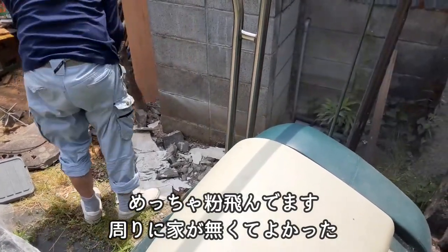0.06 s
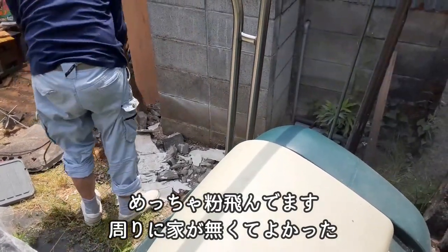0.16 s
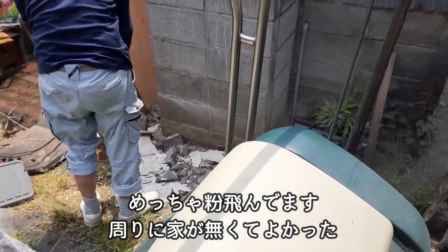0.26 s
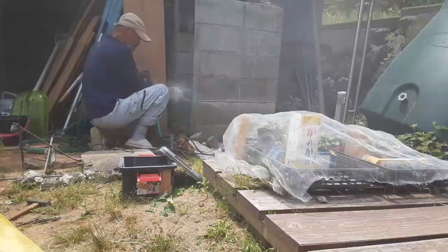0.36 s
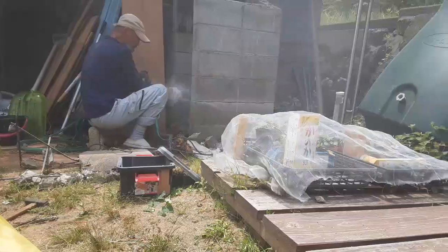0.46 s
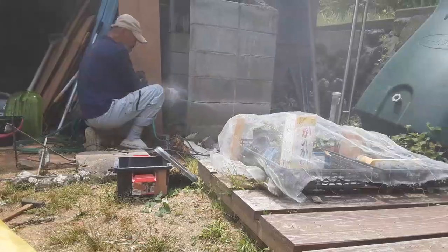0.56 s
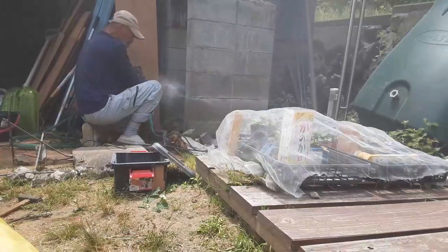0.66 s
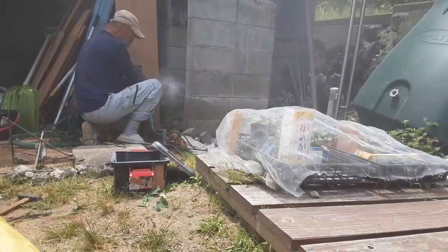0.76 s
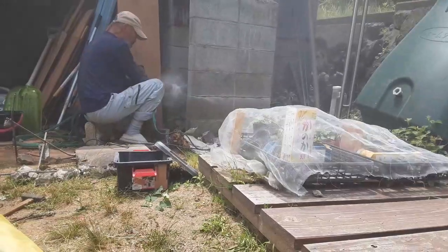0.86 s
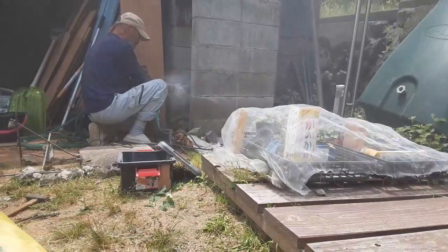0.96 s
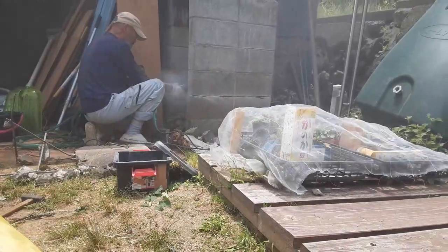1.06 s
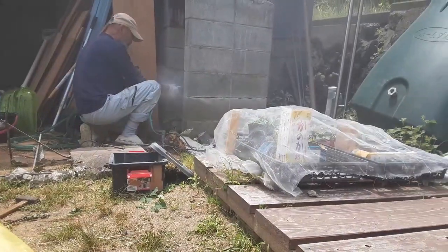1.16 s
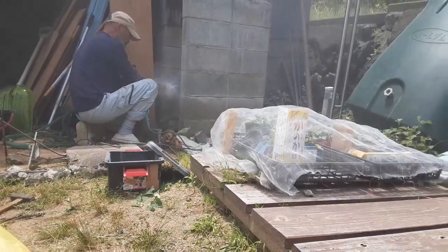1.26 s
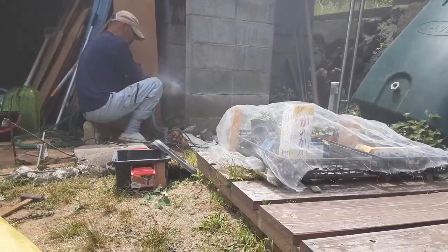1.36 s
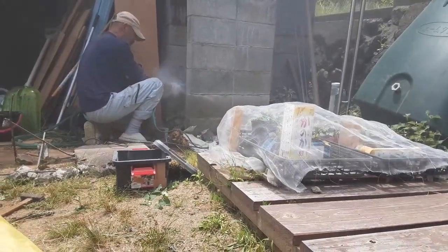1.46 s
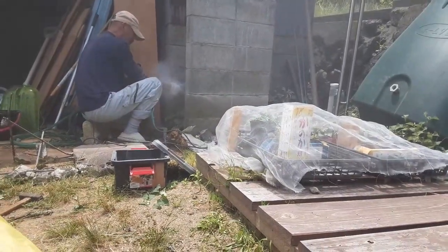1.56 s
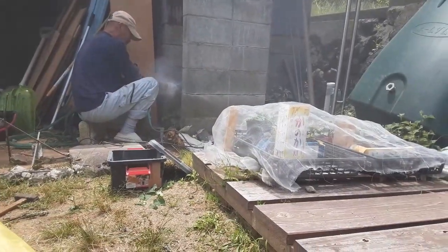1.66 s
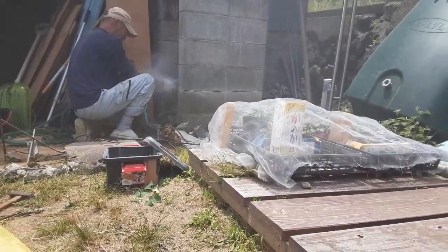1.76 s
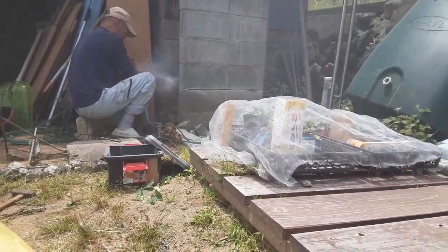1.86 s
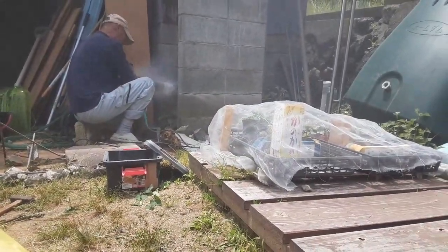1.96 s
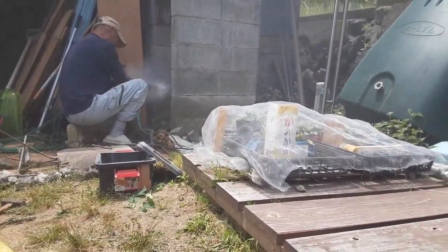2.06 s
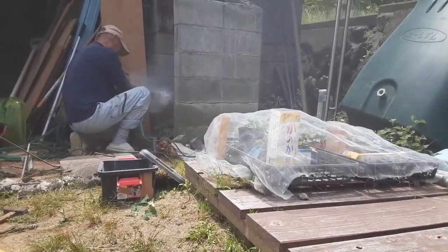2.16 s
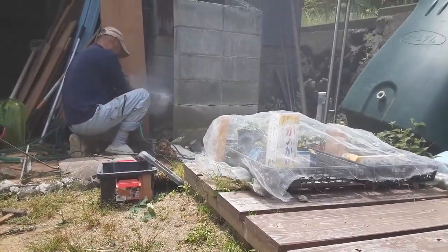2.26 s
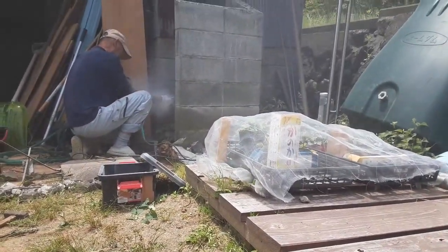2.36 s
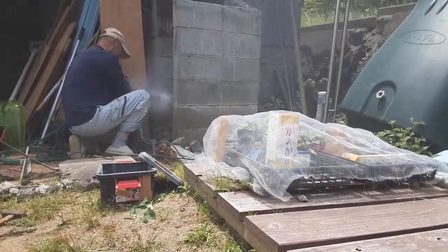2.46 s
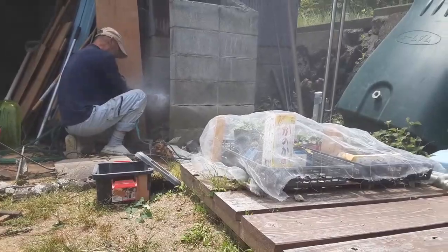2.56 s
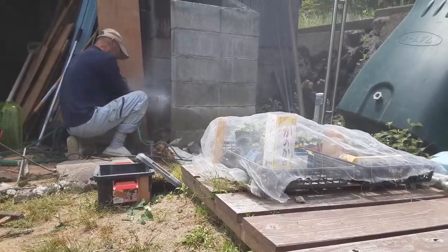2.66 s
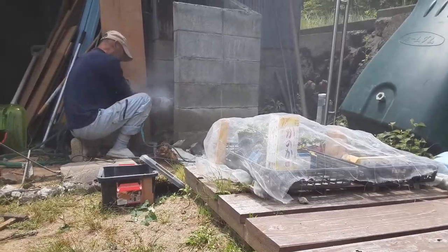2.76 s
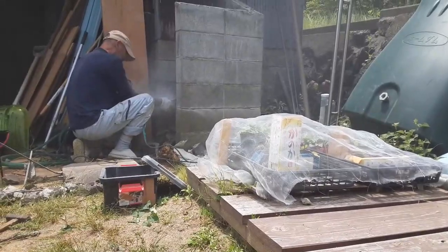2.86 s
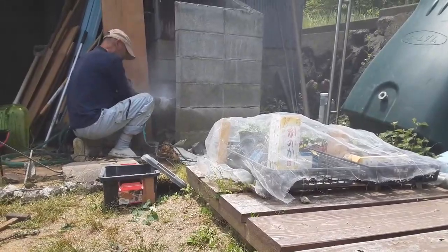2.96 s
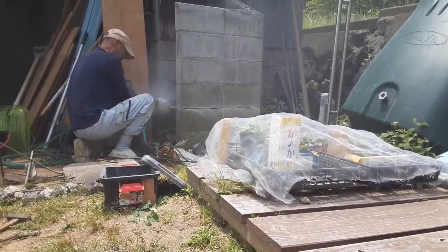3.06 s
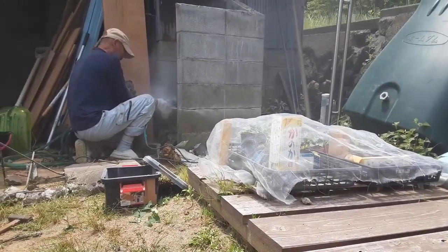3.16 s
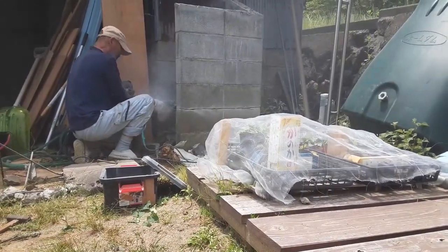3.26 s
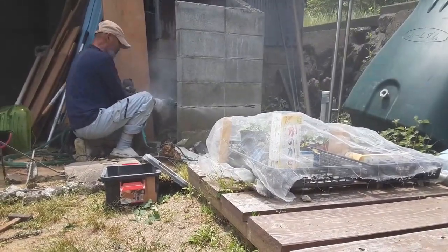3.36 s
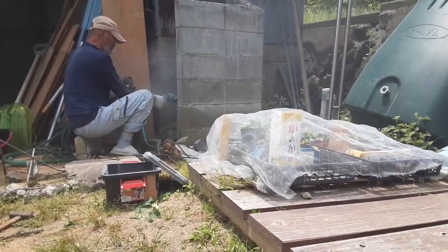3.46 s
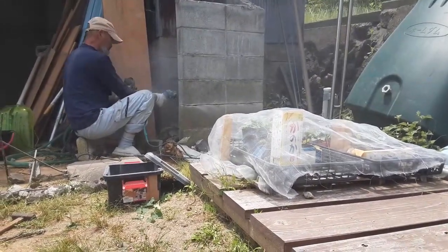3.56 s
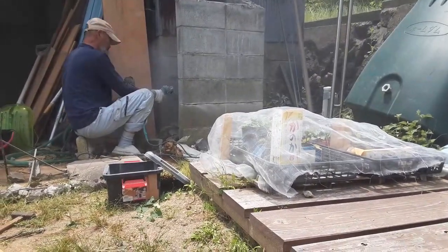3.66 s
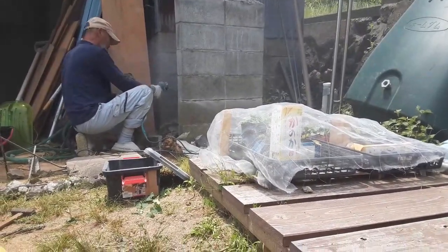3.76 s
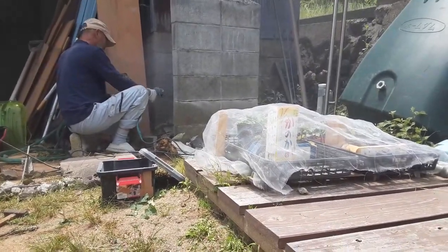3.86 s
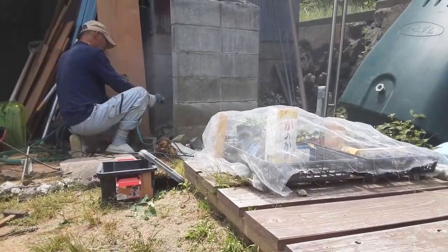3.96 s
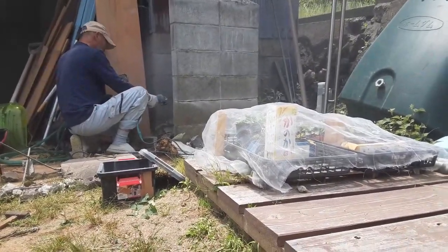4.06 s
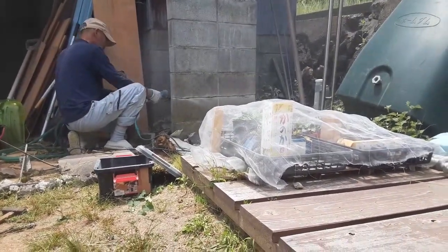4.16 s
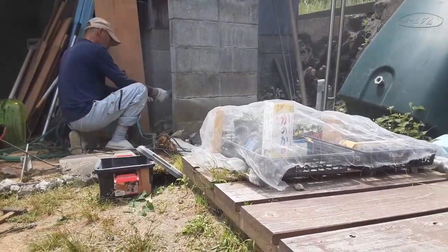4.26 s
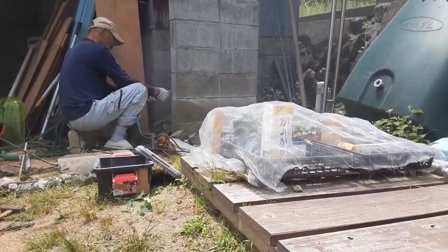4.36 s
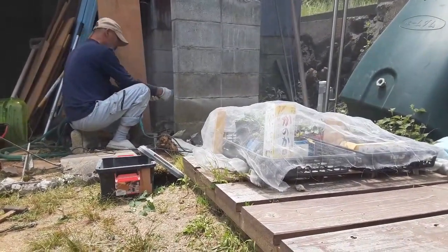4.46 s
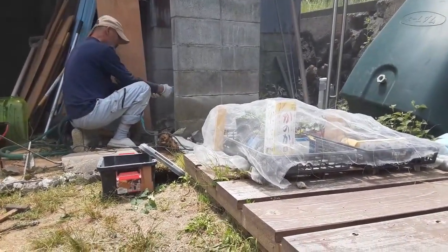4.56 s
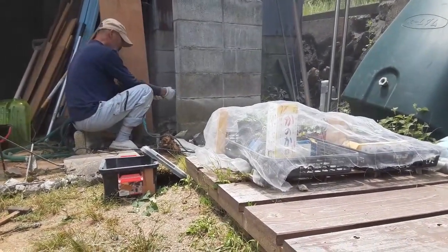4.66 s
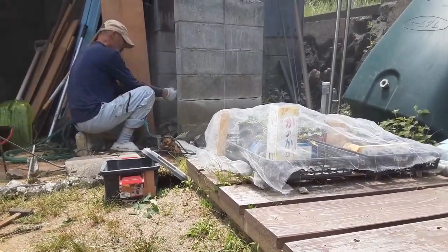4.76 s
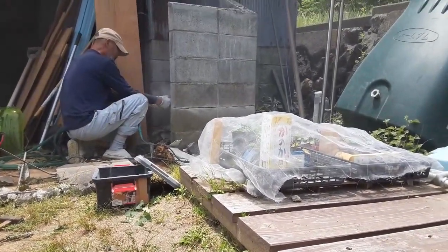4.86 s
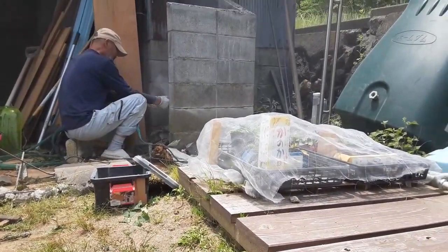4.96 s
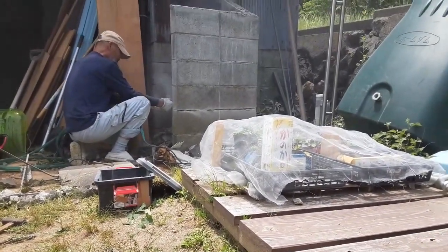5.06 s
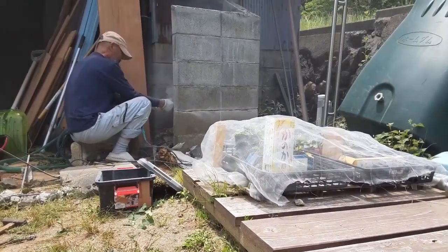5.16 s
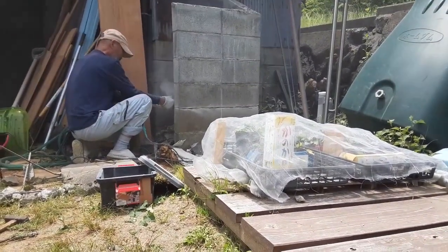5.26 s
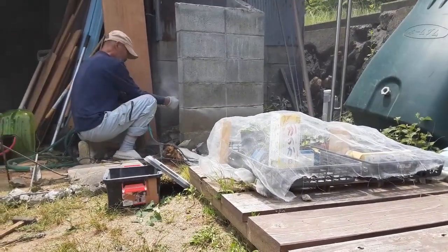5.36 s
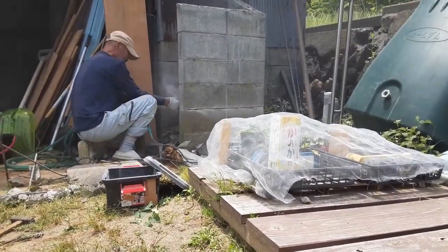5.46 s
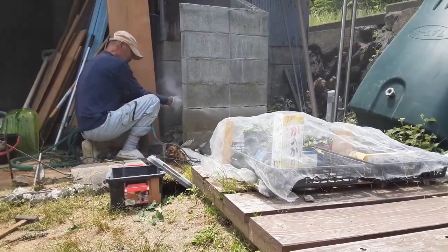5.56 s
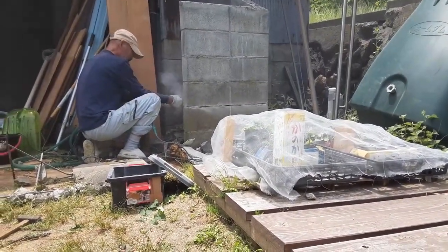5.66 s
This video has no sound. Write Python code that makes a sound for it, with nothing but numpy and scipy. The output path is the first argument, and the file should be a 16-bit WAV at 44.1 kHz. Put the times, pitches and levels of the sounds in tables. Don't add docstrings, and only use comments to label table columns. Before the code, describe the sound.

Steady low hum underlies a hissing power grinder cutting concrete with a gritty metallic screech; the hum stops dead, and after a pause the cutting resumes.

```python
import sys
import numpy as np
from scipy import signal
from scipy.fft import rfft, irfft, next_fast_len
from scipy.io import wavfile
from scipy.ndimage import uniform_filter1d, map_coordinates

SR = 44100
rng = np.random.default_rng(int(sys.argv[2]) if len(sys.argv) > 2 else 0)


def master(y):
    cut = np.clip(np.atleast_2d(y).T, -1, 1)
    pcm = np.round(cut * 32767)
    wavfile.write(sys.argv[1], SR, pcm.astype(np.int16))


def invert_db(level):
    return 10 ** (np.asarray(level, dtype=float) / 20)


N = 251674

# (time [s], pressure [dB], upper modes over lower [dB])
CUT_PRESSURE = [
    [(.47, -42.5, -1), (.68, -40, 1), (.83, -44.5, 0), (.87, -48, 3), (1.02, -46.5, 4), (1.33, -42.5, 1.5),
     (1.8, -42.5, 4), (2.6, -42.5, 2.5), (3.31, -40.5, 2)],
    [(4.38, -69, 7), (4.69, -49, 5.5), (4.74, -45.5, 5.5), (4.8, -42.5, 6), (4.91, -43, 4), (5.0, -43, 2.5),
     (5.16, -42, 2), (5.4, -42.5, 0), (5.71, -41.5, 2)],
]
# (time [s], peak [dB])
RIM_CATCHES = [(.47, -32.5), (.84, -40.5), (1.12, -41.5), (1.35, -40), (2.06, -38.5), (2.67, -38),
               (2.89, -39), (4.434, -41), (4.548, -46), (4.642, -40.5), (4.81, -38), (4.915, -37.5),
               (5.16, -38.5)]
# (time [s], turns [Hz])
DISC_SPEED = [(.46, 115.6), (.7, 112), (1.1, 135.2), (1.5, 121.7), (2, 115.4), (2.4, 118.9), (3.25, 103.8),
              (3.33, 109), (3.42, 142), (4.38, 186), (4.75, 186.3), (4.9, 163.1), (5.15, 134.8),
              (5.3, 127.4), (5.45, 120.2), (5.71, 118.7)]
MODE_HZ = [2080, 2700, 2900, 3250, 3620, 3890, 4780, 4810, 6170, 6180, 8060, 8040, 10490, 10470, 11980,
           13220, 13220, 14380, 16200, 15720]
# (width [Hz], first cut level [dB], second cut level [dB])
MODE_LEVELS = [(84, -4, -7), (32.2, -9.5, -23), (50, -8, 1), (150, -6.5, -9), (50, -5, -2.5),
               (55.7, 0, -7.5), (44.6, -4, 2.5), (79.6, 2, 4.5), (55.3, 3, 2), (82.6, 7.5, 7),
               (80, -4.5, -8), (67, -3, -0.5), (80, -7.5, -9.5), (68.6, 1.5, -1), (202, -8, -9),
               (77, -6.5, -9.5), (50, -2, -2.5), (300, -5, -15), (90, -1.5, -2), (50.3, -20, -3)]
MODE_WAVES = [0, 0, 0, 0, 0, 0, -2, 2, -3, 3, -4, 4, -5, 5, 0, -6, 6, 0, -7, 0]
# (frequency [Hz], level [dB per Hz])
GRIT_COLOUR = [(290, -21), (500, -20), (1680, -12), (2030, -4), (3880, -3.5), (4960, -0.5), (5490, -5),
               (6440, -2.5), (9230, -10), (11100, -2.5), (13300, -6), (14800, -0.5), (15800, -14.5)]
# (time [s], peak [dB])
CHIP_TICKS = [
    (3.4565, -39),
]
# (time [s], airflow [dB])
FREE_RUNS = [
    [(0, -52), (.05, -50), (.26, -42), (.438, -44)],
    [(3.33, -73), (3.43, -82), (3.565, -75.5)],
    [(3.575, -60), (3.88, -57), (4.04, -49.5), (4.19, -43.5), (4.39, -45), (4.71, -48.5), (5.03, -56.5),
     (5.71, -77)],
]
# (frequency [Hz], level [dB per Hz])
FAN_COLOURS = [
    [(180, -65), (300, -13), (331, -29), (454, -16.5), (1180, -5.5), (1290, 0.5), (1420, -5.5), (1700, -5),
     (2890, -1.5), (4370, -11.5), (5330, -5), (11200, -15.5), (15600, -5.5)],
    [(120, -81), (200, -50), (315, -34), (516, -24.5), (565, -27), (608, -16), (860, -16.5), (995, -7),
     (2100, -1.5), (2920, -4.5), (3760, -9.5), (6740, -9.5), (12500, -20.5), (15600, -10)],
]
# (start [s], length [s], from [Hz], to [Hz], peak [dB])
COMMUTATOR = [
    (0, .435, 14450, 15300, -52),
    (3.43, .135, 14000, 15800, -63),
    (3.6, .2, 12300, 13800, -69),
]
# (start [s], length [s], from [Hz], to [Hz], peak [dB])
GEARS = [
    (4.3, .44, 636, 618, -69),
    (4.8, .4, 532, 538, -66),
    (5.48, .23, 525, 543, -71),
    (4.68, .12, 128.2, 124, -71),
    (5.26, .18, 176, 173.3, -67),
]
# (start [s], length [s], peak [dB])
SPINDLE_THRUMS = [
    (4.55, .32, -67),
    (4.97, .28, -58),
    (5.3, .41, -69),
]
# (harmonic number [count]), (rms [dB])
MAINS_OVERTONES = [
    [2, 3, 4, 5, 7, 9, 11, 13],
    [-63.5, -50, -68.5, -61.4, -72.3, -75, -76, -78],
]
# (frequency [Hz], level [dB per Hz])
FUZZ_COLOUR = [(3, 5.5), (20, -2.5), (60, -3), (150, -9.5), (400, -16.5), (1200, -21), (3000, -53)]
# (frequency [Hz], level [dB per Hz])
YARD_COLOUR = [(18, -84), (30, -48), (433, -33), (877, -32), (974, -17.5), (1520, -7), (2310, -14),
               (2500, -15), (4330, -17), (4680, -16), (6240, -14), (15600, -26)]
# (frequency [Hz], level [dB per Hz])
RUMBLE_COLOUR = [(12, -46), (20, -37), (97, 8), (375, 2.5), (532, 2.5), (687, -3), (900, -19), (1170, -31),
                 (1980, -120)]
# (frequency [Hz], left over right [dB])
PORT_BALANCE = [(100, 3), (1200, 0.5), (2100, 2), (2850, -4.5), (3850, 8.5), (4550, 2.5), (5750, -14.5),
                (6550, -5), (7600, 14), (8600, 16), (10000, 3), (11100, 7.5), (12400, 0.5), (14500, 11)]
# (frequency [Hz], left-right likeness [0-1])
LIKENESS = [(60, 0.51), (300, 0.15), (700, 0.085), (2000, 0.07), (15000, .05)]

CATCH_RISE, CATCH_FALL = 420, 390
CATCH_DULLS, CATCH_GRIT = 0.29, 0.53
GRIT_DB, GRIT_GROWS, FIRM_DB = -47.5, 0.63, -42.5
LIFT_S, RING_DIES, UPPER_DIES, GRIT_DIES = .095, 150, 115, 300
HISS_DB, HISS_OPENS, FULL_DB = (-1.5, 26, -0.5), 0.17, -44
SWELL_DB, CREST, EASE = 6, .65, 1.25
MAINS_HZ, MAINS_START, MAINS_OFF = 59.9602, -1.62, 3.57053
WALL_S, WALL_RISE_S, WALL_DB = 4.05, .3, -71


def cutting():
    out = np.zeros((2, N))
    spin_hz = curves(DISC_SPEED)[1]
    for rows, levels_db, pan_db in zip(CUT_PRESSURE, np.transpose(MODE_LEVELS)[1:], (-.6, 1.5)):
        start, stop = rows[0][0] - .006, rows[-1][0] + .15
        on = slice(round(start * SR), round(stop * SR))
        gate, ring_db, upper_db, grit_db = (c[on] for c in touch(rows))
        chatter_db = 0.87 * wobble(14)[on] + 0.47 * wobble(60)[on]
        ring = ringing(levels_db, spin_hz[on], upper_db + 3.5, drift_db=2.5, wander=.0025, alike=0.14)
        spray = invert_db(grit_db + 7.0) * rush(GRIT_COLOUR, patchy_db=1.34, streaky_db=5.0)[:, on]
        pan = pan_db * np.c_[[.5, -.5]]
        out[:, on] += gate * invert_db(chatter_db + pan) * (invert_db(ring_db - 6.0) * ring + spray)
    return out


def touch(rows):
    t, end = np.arange(N) / SR, rows[-1][0]
    _, press_db, upper_db = curves(rows)
    peaks = [db - np.maximum(CATCH_RISE * (s - t), CATCH_FALL * (t - s)) for s, db in RIM_CATCHES]
    ring_db = np.max(peaks + [press_db], axis=0)
    jolt_db = ring_db - press_db
    lifted = np.clip(t - end, 0, None)
    push_db = press_db + CATCH_GRIT * jolt_db - FIRM_DB
    grit_db = GRIT_DB + GRIT_GROWS * push_db - GRIT_DIES * lifted
    upper_db = upper_db - CATCH_DULLS * jolt_db + (RING_DIES - UPPER_DIES) * lifted
    gate = curves([(rows[0][0],), (end + LIFT_S,)])[0]
    return gate, ring_db - RING_DIES * lifted, upper_db, grit_db


def ringing(levels_db, spin_hz, tilt_db, drift_db, wander, alike):
    n, out, hop = len(spin_hz), 0, 8
    t, turned = np.arange(n) / SR, np.cumsum(spin_hz) / SR
    coarse = np.arange(0, n + hop, hop)
    size = len(coarse)
    for hz, (width, *_), waves, db in zip(MODE_HZ, MODE_LEVELS, MODE_WAVES, levels_db):
        pole = np.exp(-np.pi * 1.5 * width * hop / SR)
        kicks = rng.standard_normal((2, size)) + 1j * rng.standard_normal((2, size))
        env = unit(signal.lfilter([1], np.poly([pole, pole]), kicks))
        env[1] = alike * env[0] * np.exp(1j * hz) + np.sqrt(1 - min(alike, 1) ** 2) * env[1]
        detune_hz = wander * hz * wobble(6 * hop, size=size)
        env = env * np.exp(2j * np.pi * np.cumsum(detune_hz) * hop / SR)
        env = env * invert_db(db + drift_db * wobble(4 * hop, size=size)) * np.sqrt(width / 100)
        carrier = np.exp(2j * np.pi * (hz * t + waves * turned)) * invert_db(tilt_db * (hz > 7500))
        out = out + np.array([(np.interp(np.arange(n), coarse, e) * carrier).real for e in env])
    return out


def tick():
    out, t = np.zeros(N), np.arange(SR // 20) / SR
    for s, db in CHIP_TICKS:
        ring = np.sin(2 * np.pi * 6600 * t)
        ring += .7 * np.sin(2 * np.pi * 5600 * t) + 0.34 * np.sin(2 * np.pi * 7700 * t)
        fall = invert_db(db - 1.0 - 60 * t / 0.012)
        out[round(s * SR):][:len(t)] = fall * (ring + .1 * rng.standard_normal(len(t)))
    return out


def fan():
    out = 0
    near, farther = FAN_COLOURS
    for rows, colour, full_db in zip(FREE_RUNS, (near, farther, farther), HISS_DB):
        gate, flow_db = curves(rows)
        air = rush(colour, patchy_db=0.17, streaky_db=4.0) * invert_db(0.37 * wobble(12))
        low = filtered(air, lambda hz: 1 / (1 + (hz / 4200) ** 4))
        hiss = invert_db(full_db + HISS_OPENS * (flow_db - FULL_DB) + 2.5) * (air - low)
        out = out + gate * invert_db(flow_db + 4.5) * (low + hiss)
    return out


def whines():
    t, out = np.arange(N) / SR, 0
    for rows, flutter_db, jitter in ((COMMUTATOR, 3.5, .0015), (GEARS, 4, .014)):
        for s, length, from_hz, to_hz, db in rows:
            left = (1 - np.clip((t - s) / length, 0, 1)) ** EASE
            hz = to_hz + (from_hz - to_hz) * left
            out = out + line(s, length, hz, db, flutter_db, jitter)
    spin_hz = curves(DISC_SPEED)[1]
    for s, length, db in SPINDLE_THRUMS:
        out = out + line(s, length, spin_hz, db, 1.5, 0.01)
    return out


def line(s, length, hz, db, flutter_db, jitter):
    swell = [(s, -SWELL_DB), (s + CREST * length, 0), (s + length, -SWELL_DB / 2)]
    gate, swell_db = curves(swell, fade=0.0088)
    phase = 2 * np.pi * np.cumsum(hz * (1 + jitter * wobble(70))) / SR
    lag = .45 + .35 * wobble(8)
    level_db = db + swell_db + 3.5 + flutter_db * wobble(25)
    return gate * invert_db(level_db) * np.sin([phase + lag, phase - lag])


def hum():
    t = np.arange(N) / SR
    phase = 2 * np.pi * MAINS_HZ * t + MAINS_START
    wave = invert_db(-32.5) * np.cos(phase)
    for k, db in zip(*MAINS_OVERTONES):
        wave += (-1) ** ((k - 1) // 2) * invert_db(db) * np.cos(k * phase - 1.08)
    fuzz = filtered(rng.standard_normal(N), lambda hz: invert_db(along(FUZZ_COLOUR, hz)))
    offset = .031
    return (np.sqrt(2) * wave + invert_db(-54.5) * unit(fuzz) + offset) * (t < MAINS_OFF)


def yard():
    air = invert_db(-53.5) * rush(YARD_COLOUR, patchy_db=3.0, streaky_db=2.4)
    wake = np.clip((np.arange(N) / SR - WALL_S) / WALL_RISE_S, 0, 1)
    rumble = invert_db(WALL_DB + 1.8 * wobble(5.4)) * rush(RUMBLE_COLOUR, patchy_db=-3, streaky_db=4.5)
    return air + wake * rumble


def rush(colour, patchy_db, streaky_db):
    z = signal.stft(rng.standard_normal((2, N)), nperseg=1024)[2]

    def field(bins, frames):
        grain = uniform_filter1d(rng.standard_normal(z.shape[1:]), bins, axis=0)
        return unit(uniform_filter1d(grain, frames, axis=1))

    def mid_side(hz):
        angle = np.arccos(np.clip(along(LIKENESS, hz), -1, 1)) / 2
        return invert_db(along(colour, hz)) * [np.cos(angle), np.sin(angle)]

    gain = invert_db(patchy_db * field(12, 5) + streaky_db * field(1, 6))
    pair = signal.istft(z * gain, nperseg=1024)[1][:, :N]
    mid, side = filtered(pair, mid_side)
    return unit(np.array([mid + side, mid - side]))


def filtered(x, response):
    m = next_fast_len(N + 8192)
    return irfft(rfft(x, m) * response(np.fft.rfftfreq(m, 1 / SR)), m)[..., :N]


def wobble(rate, size=N):
    knots = rng.standard_normal(int(size * rate / SR) + 4)
    return map_coordinates(knots, [np.arange(size) * rate / SR], order=1)


def curves(rows, fade=0.0065):
    s, *cols = np.transpose(rows)
    t = np.arange(N) / SR
    gate = np.clip(np.minimum(t - s[0], s[-1] - t) / fade + 1, 0, 1)
    return [gate] + [np.interp(t, s, c) for c in cols]


def along(points, hz):
    f, v = np.transpose(points)
    return np.interp(np.log(hz + 1), np.log(f + 1), v)


def unit(x):
    return x / np.sqrt(np.mean(np.abs(x) ** 2) + 1e-20)


def scene():
    return cutting() + tick() + fan() + whines() + yard()


def top_cut(x):
    return signal.sosfilt(signal.butter(12, 15870, fs=SR, output="sos"), x)


def record(dry):
    def shading(hz):
        left = 1 / (1 + invert_db(-2 * along(PORT_BALANCE, hz)))
        return np.sqrt(2 * np.array([left, 1 - left]))

    ports = filtered(dry, shading)
    mix = filtered(ports + hum(), lambda hz: hz < 15830)
    return top_cut(mix)


dry = scene()
out = record(dry)
master(out)
```